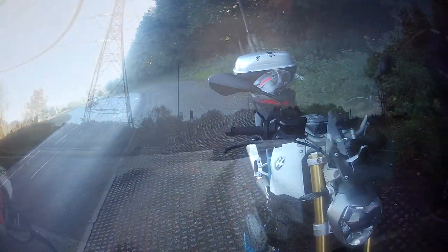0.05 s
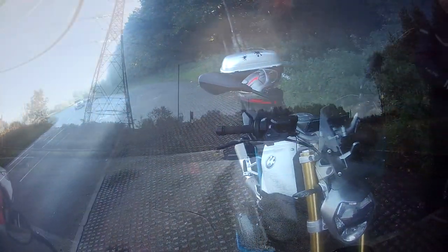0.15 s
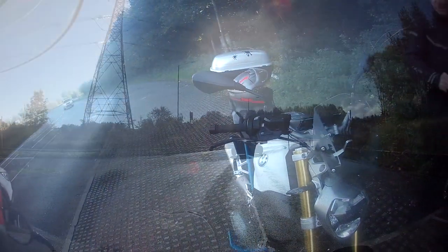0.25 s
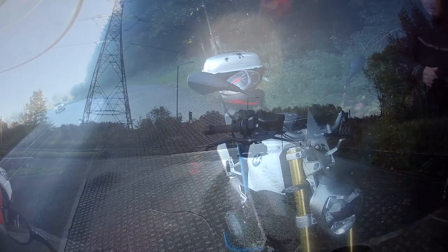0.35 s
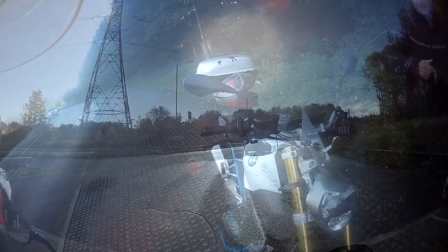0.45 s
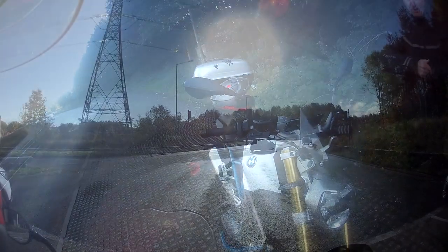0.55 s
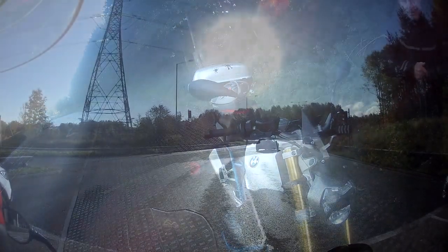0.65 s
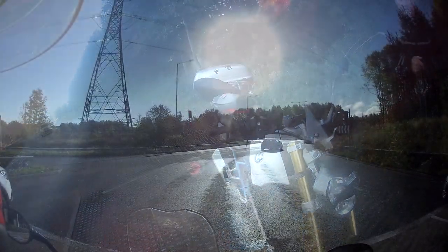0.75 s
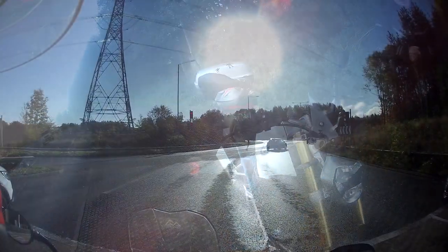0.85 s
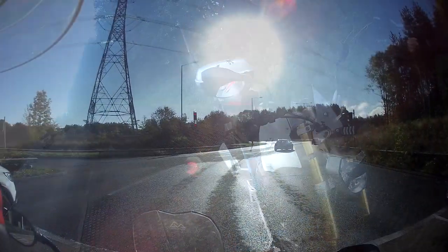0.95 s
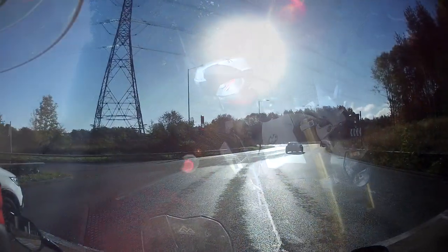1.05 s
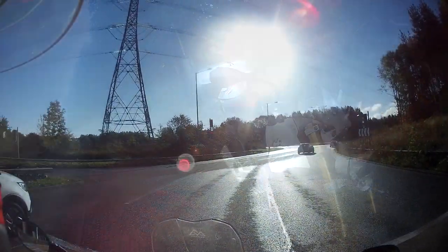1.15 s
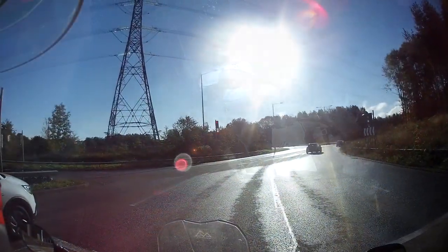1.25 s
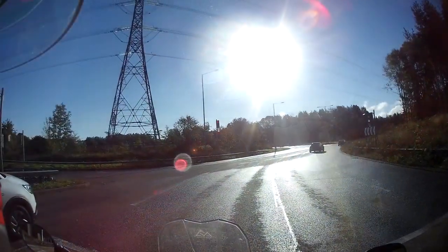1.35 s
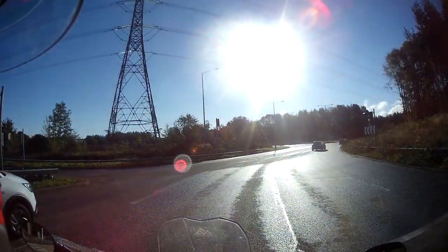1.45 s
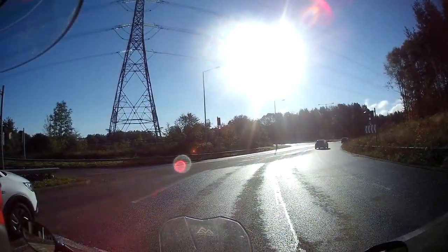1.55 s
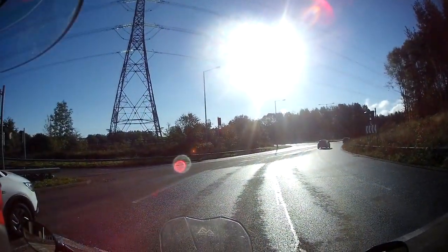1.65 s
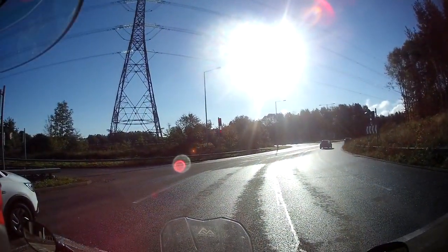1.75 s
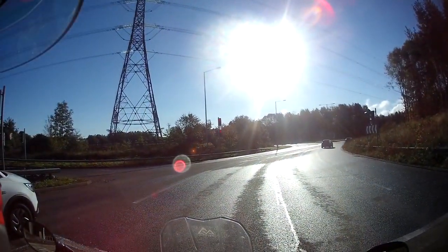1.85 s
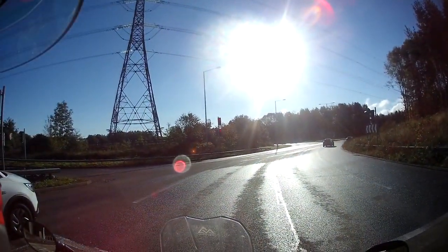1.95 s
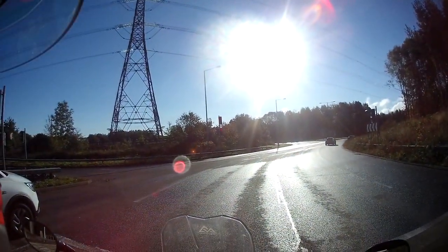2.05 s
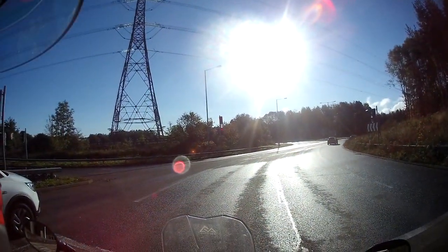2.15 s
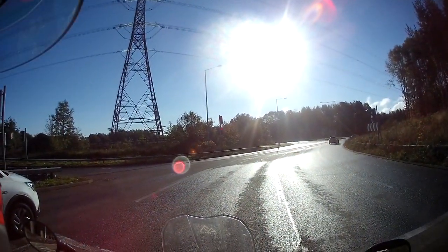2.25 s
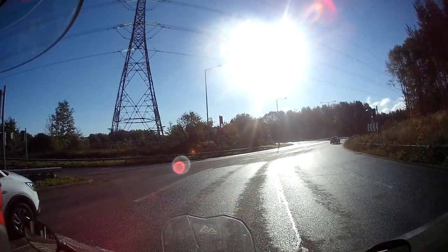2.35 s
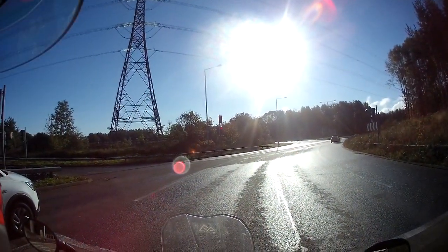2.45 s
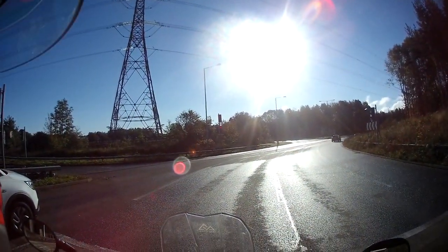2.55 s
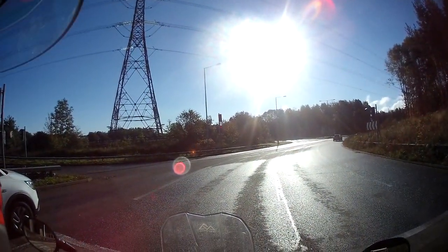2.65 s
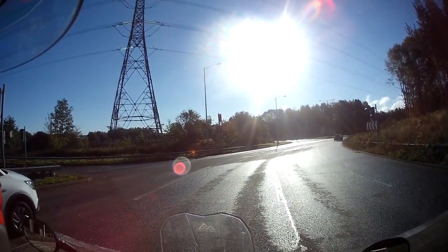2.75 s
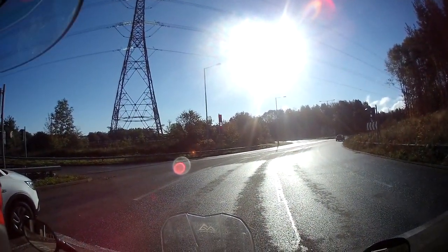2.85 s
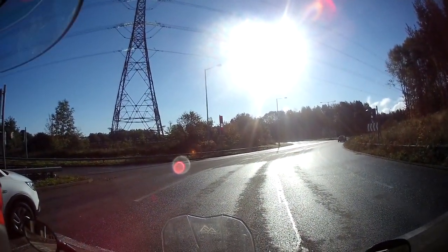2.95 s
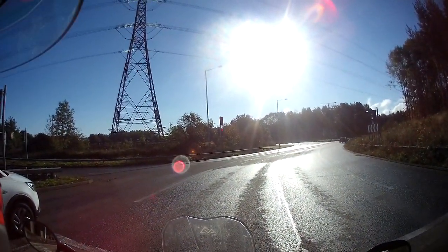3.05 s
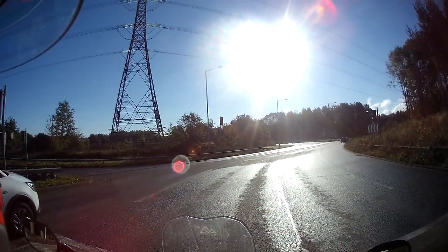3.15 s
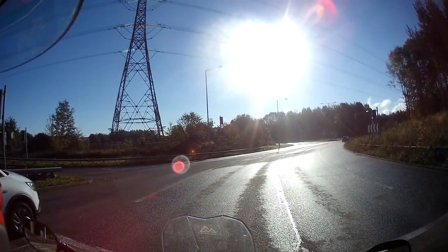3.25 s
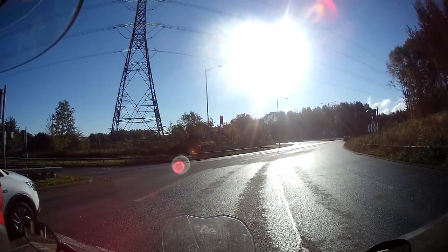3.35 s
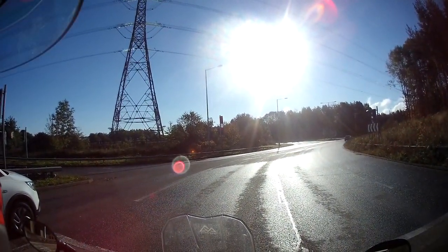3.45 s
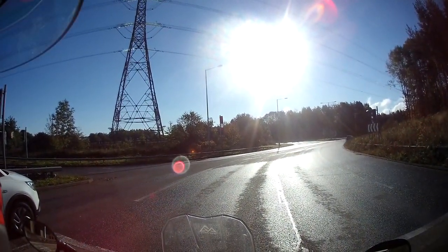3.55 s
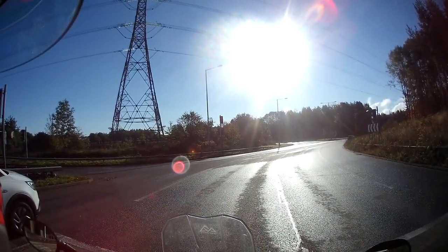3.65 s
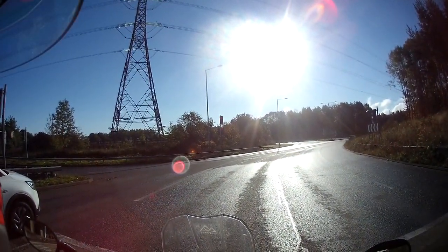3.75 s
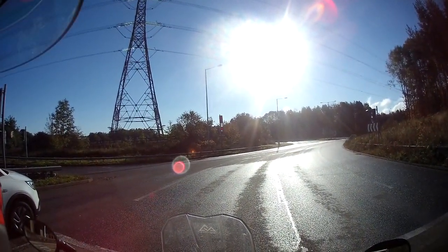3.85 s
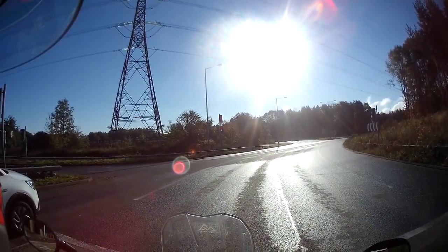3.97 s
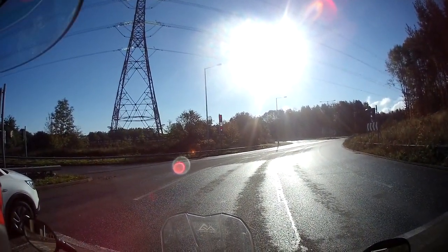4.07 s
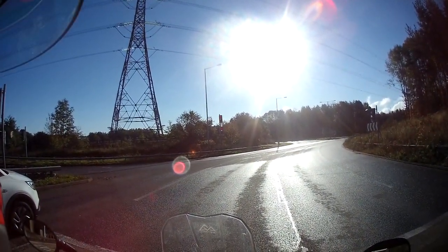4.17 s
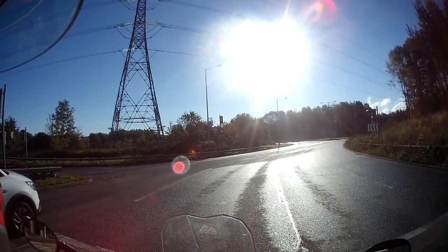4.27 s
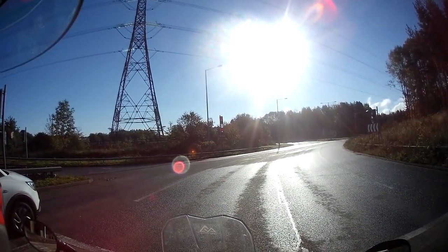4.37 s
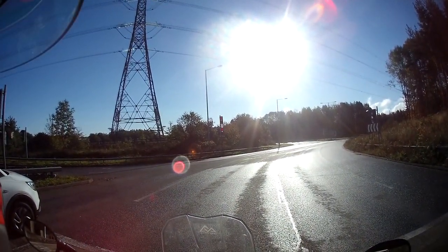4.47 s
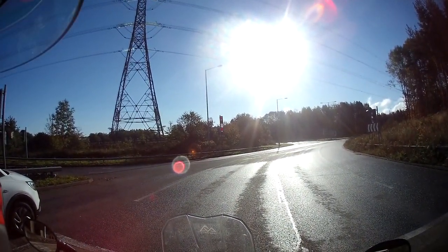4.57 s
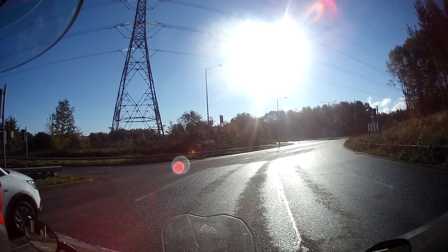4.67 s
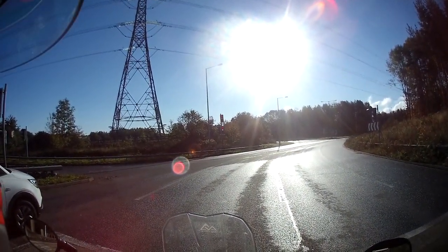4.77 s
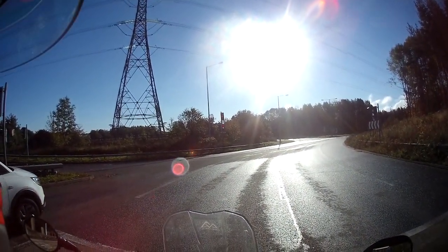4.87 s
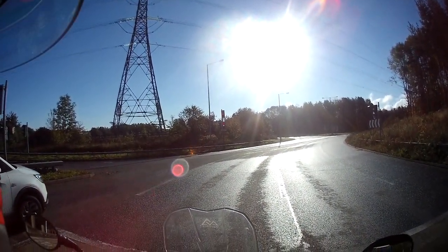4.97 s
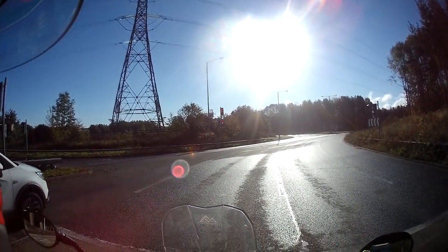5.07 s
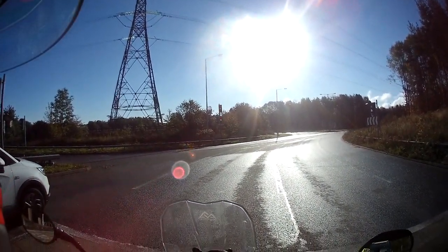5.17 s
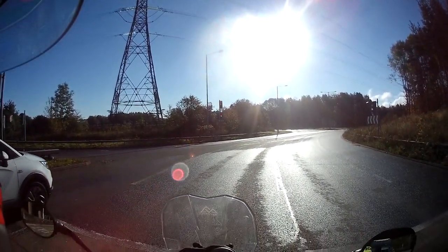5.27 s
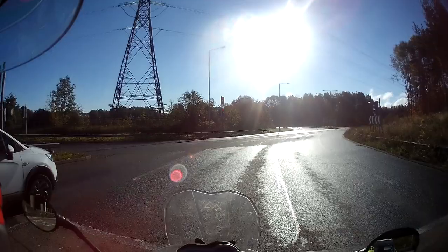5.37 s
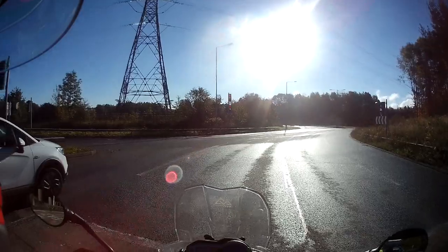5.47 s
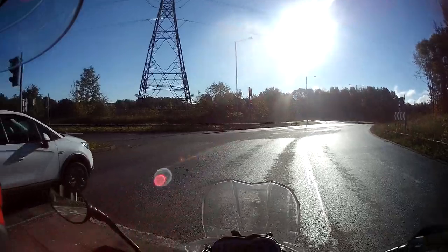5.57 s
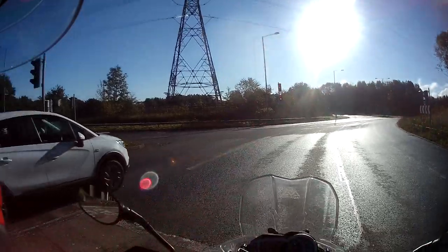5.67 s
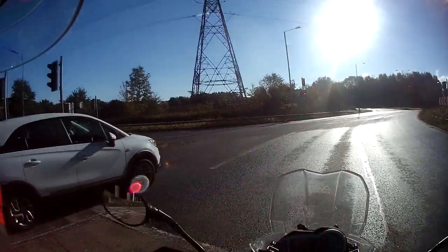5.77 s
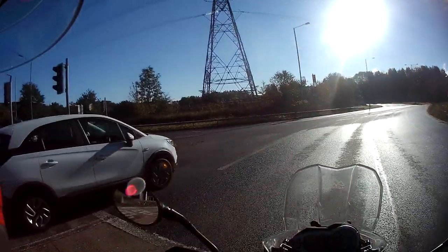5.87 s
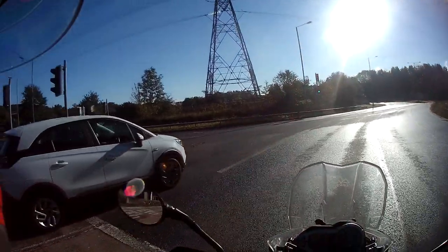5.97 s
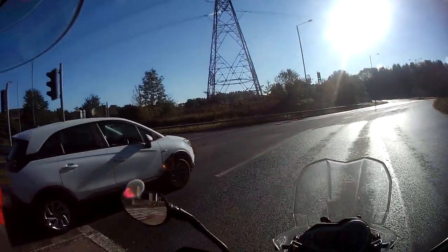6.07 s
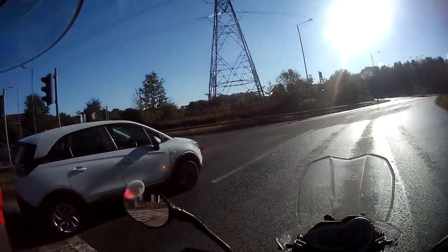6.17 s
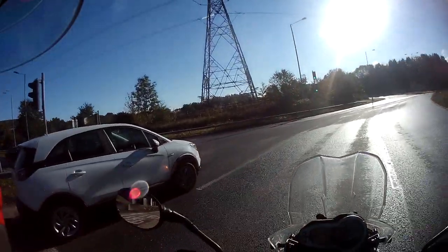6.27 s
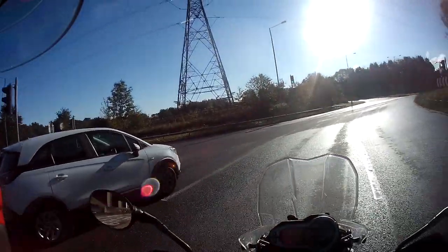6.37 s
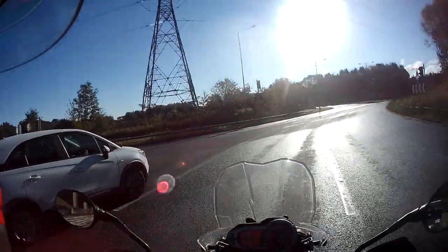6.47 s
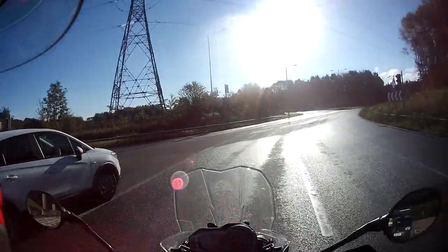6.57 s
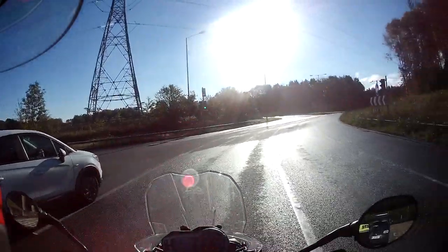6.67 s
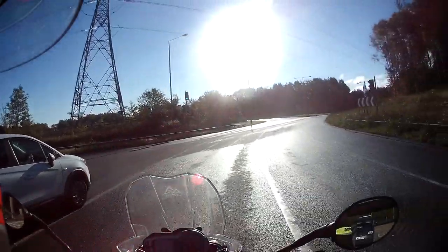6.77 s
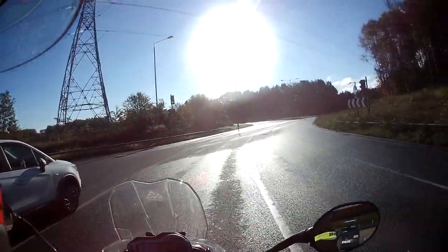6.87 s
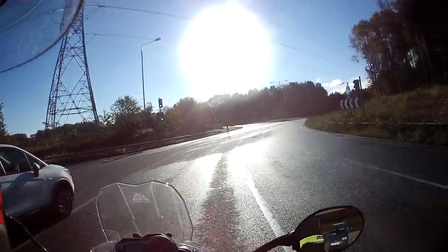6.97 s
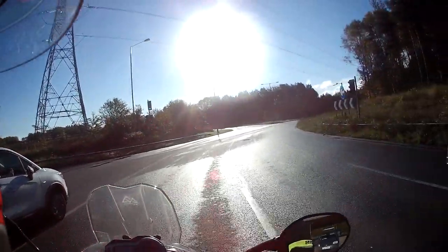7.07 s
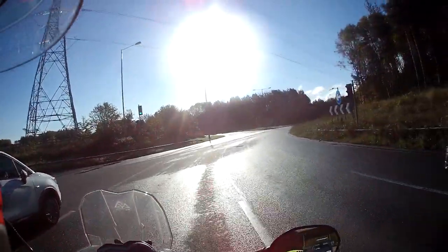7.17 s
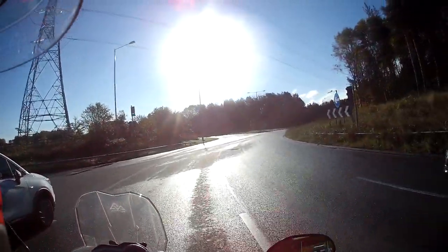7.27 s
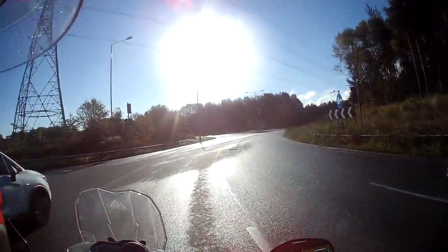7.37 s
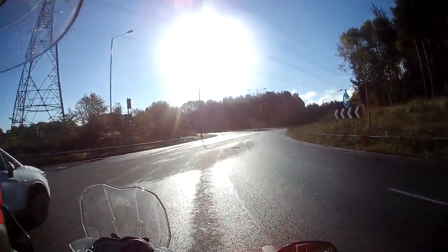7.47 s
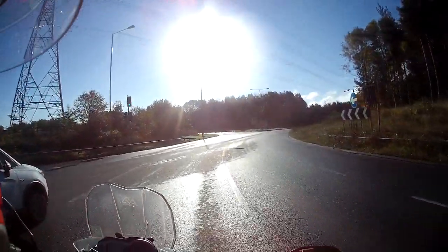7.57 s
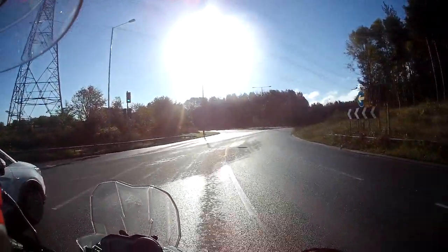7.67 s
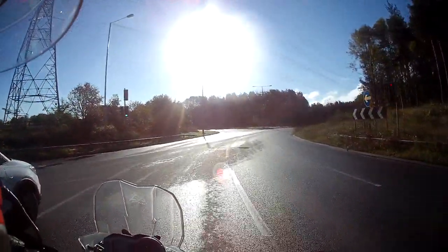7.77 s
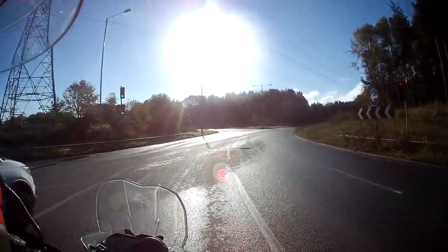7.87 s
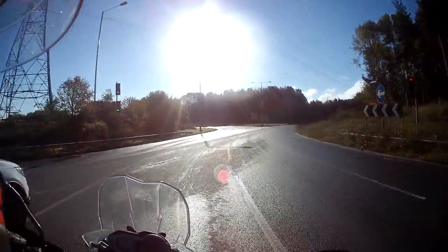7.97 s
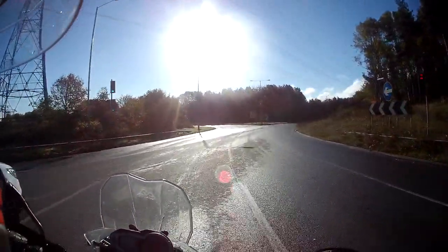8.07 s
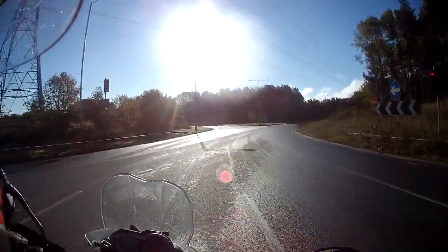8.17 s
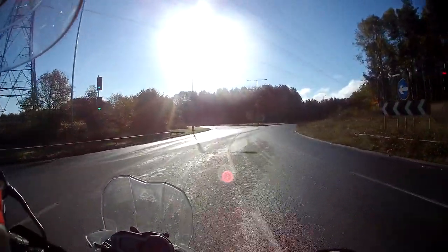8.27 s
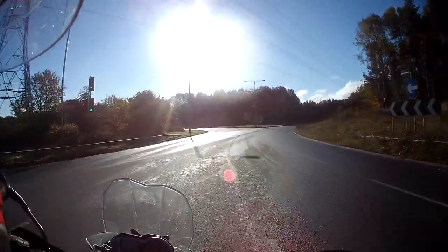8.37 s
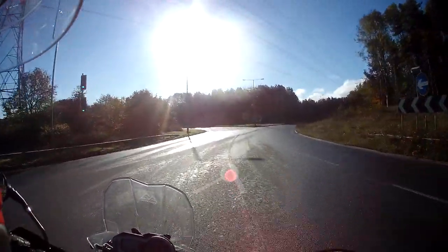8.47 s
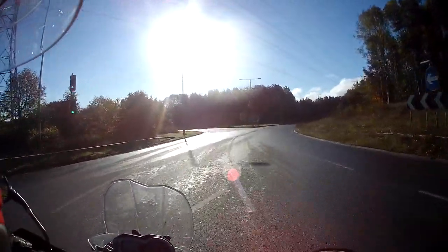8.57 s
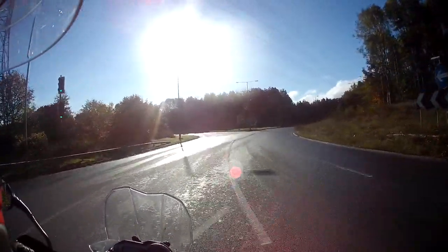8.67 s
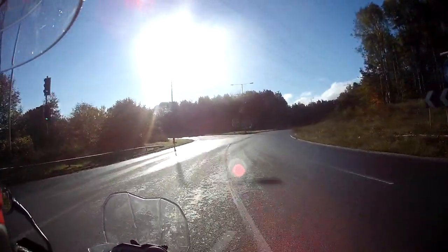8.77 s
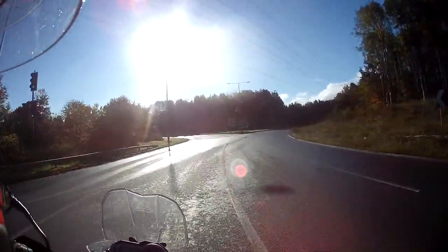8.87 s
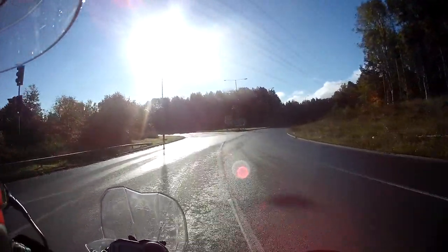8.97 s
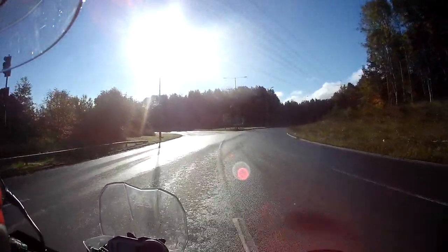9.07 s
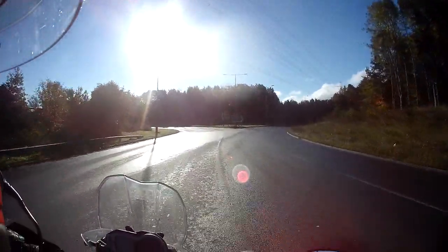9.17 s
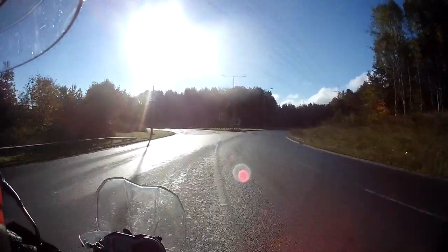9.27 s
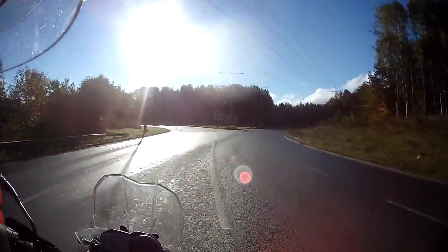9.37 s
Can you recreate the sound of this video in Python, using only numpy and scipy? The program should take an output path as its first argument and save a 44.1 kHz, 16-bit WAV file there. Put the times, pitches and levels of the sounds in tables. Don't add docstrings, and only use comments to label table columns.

```python
import sys
import numpy as np
from scipy import signal
from scipy.fft import rfft, irfft, next_fast_len
from scipy.io import wavfile
from scipy.ndimage import uniform_filter1d

SR = 44100
rng = np.random.default_rng(int(sys.argv[2]) if len(sys.argv) > 2 else 0)


def put_to_file(sound):
    columns = np.atleast_2d(sound).T
    safe = np.clip(columns, -1, 1)
    whole_steps = np.round(safe * 32767)
    wavfile.write(sys.argv[1], SR, whole_steps.astype(np.int16))


def volts_from_db(level):
    exponent = np.asarray(level, float) / 20
    return 10 ** exponent


N = 415422
TIME = np.arange(N) / SR
IDLE_HZ = 31

# start_s, level_db
CAR_LEVEL = [(0.0, -31), (0.008, -32.5), (0.086, -33.5), (0.308, -42.5), (0.38, -49), (0.5, -66)]
# frequency_hz, density_db
TYRE_COLOUR = [(120, -52), (200, -9.5), (505, -29), (563, -16), (663, -23), (752, -9), (1010, 0.5),
               (1670, -10.5), (2000, -22), (2230, -32), (2880, -30), (3100, -29), (3800, -27), (4300, -18),
               (4900, -32), (7140, -43), (15300, -42)]
# start_s, firing_hz, drive_load (0-1), exhaust_db, main_gear_teeth_db
PULL_AWAY = [(0.0, 32.5, 0.33, -45.5, -47), (1.2, 32.08, 0.1, -45.5, -43), (2.2, 31.85, 0.11, -45, -40.5),
             (2.5, 31.04, 0.01, -46.5, -42), (4.96, 31.58, 0, -45.5, -41.5), (5.02, 37.5, .02, -41.5, -44),
             (5.06, 40.7, 0.02, -39.5, -43.5), (5.14, 47, 0.1, -38.5, -44), (5.37, 60.27, 0, -35, -31.5),
             (5.45, 65.97, 0.1, -37.5, -39), (5.61, 75.4, 0.23, -34, -47), (5.7, 77.3, 0.01, -30.5, -47),
             (5.8, 75.8, 0.03, -29.5, -46), (5.97, 72.2, 0, -34.5, -48), (6.21, 62.7, 0.05, -36, -42),
             (6.49, 56.1, 0.25, -34, -46), (6.66, 56.13, 0.45, -35, -48), (6.92, 61.05, 0.31, -34.5, -38),
             (7.14, 58.15, 0.6, -36.5, -43), (7.5, 68.85, 0.44, -35.5, -49), (7.75, 76.42, 0.62, -32, -45),
             (8.0, 84.6, 0.78, -32, -45), (8.24, 92, 1, -34, -40.5), (8.48, 99.4, 1, -30, -36.5),
             (8.74, 106.1, 0.96, -33, -39)]
# start_s, firing_hz, drive_load (0-1), exhaust_db, main_gear_teeth_db
SHIFT_UP = [
    (8.82, 108.7, 0.39, -37.5, -39),
    (8.87, 94.5, 0.57, -40, -37.5),
    (8.93, 83.56, 0.19, -31.5, -40),
    (9.0, 78.3, 0.15, -42, -37),
    (9.08, 84.84, 0.21, -34, -39),
    (9.14, 94.74, 0.83, -35, -35),
    (9.19, 95.55, 0.57, -35, -40),
    (9.215, 84.84, 0.43, -32.5, -37),
    (9.37, 85.75, 0.65, -30.5, -35),
]
CYLINDER_DB = [-3, -1, -1.5]
# frequency_hz, gain_db
EXHAUST_RESPONSE = [(60, -35), (110, -7), (150, -13.5), (190, 2), (228, 6), (265, -2), (305, -2),
                    (350, -15.5), (420, -23), (540, -9), (660, -47.5), (800, -36), (1500, -56)]
# frequency_hz, gain_db
INTAKE_RESPONSE = [(60, -2.5), (100, 10), (190, 4), (220, 11), (252, -6.5), (290, 3.5), (400, -25),
                   (1000, -55)]
# frequency_hz, gain_db
BARK_RESPONSE = [(115, -25), (150, 10), (185, -20), (250, -39), (330, 0), (370, -9), (410, 1.5), (475, 2),
                 (560, -9), (660, 4.5), (780, -11.5), (1200, -44)]
# start_s, bark_db
THROTTLE_BARK = [(5.0, -24), (5.4, -6.5), (5.7, -14.5), (6.5, -11), (7.0, -17), (7.3, -4.5), (7.6, -15),
                 (8.0, -10), (8.22, -8), (8.38, -2.5), (8.74, -6.5), (8.85, -9), (9.4, -12.5)]
# frequency_hz, gain_db
AIRBOX_RESPONSE = [(15, -44), (30, 4), (50, 3.5), (68, 12), (100, 2), (130, -14), (250, -61.5)]
# firing_hz, gain_db
AIRBOX_TUNING = [(33, 2.5), (38, 11.5), (47, 2), (57, -3.5), (68, 3), (85, 0.5), (110, -4)]
# frequency_hz, width_hz, gain_db
CASING_MODES = [(1013, 132, 10), (1530, 630, -5.5), (2083, 80, 2.5), (495, 460, -7.5), (3950, 80, -24.5)]
# frequency_hz, density_db
RATTLE_COLOUR = [(150, -9.5), (250, -6.5), (334, -10), (400, -9), (656, -8.5), (772, -12.5), (1450, -17),
                 (1640, -20.5), (2080, -23), (5000, -39), (6500, -43), (11000, -120)]
# frequency_hz, density_db
GAS_COLOUR = [(1760, -13.5), (3000, -12.5), (3410, -14), (3860, -14), (5070, -18), (6140, -21),
              (8400, -33.5), (9820, -28.5), (11400, -31.5), (12800, -37), (15300, -61)]
# start_s, over_hiss_db
GAS_SPIT = [
    (4.64, -40),
    (4.652, 1),
    (4.666, -5),
    (4.68, -38),
]
# teeth_per_firing, level_db, train (0 main, 1 upper, 2 idler), idle_change_db
GEAR_TEETH = [
    (17, -6, 0, 0),
    (24, -14, 0, 0),
    (34, 0, 0, 0),
    (68, 1.5, 1, -7.5),
    (83.5, 1.5, 2, 0),
    (88.5, 2, 1, -2),
]
# start_s, upper_train_db, idler_db
TOOTH_SLACK = [(0.3, 3, -14), (1.1, -0.5, -14), (4.96, -0.5, -14), (5.0, -4, -14), (5.05, -2, -8),
               (5.09, 0, -4), (5.2, -3, -3), (5.37, -1, -2), (5.5, -2, -3), (5.7, -4, -8), (5.9, -1, -6),
               (6.1, -1, -3), (6.35, -2, -3), (6.55, -3, -6), (6.62, -4, -3), (6.7, -4, 0), (6.8, -2, -8),
               (7.1, 0, -5), (7.4, -1, -3), (7.55, -1, -4), (7.8, 0, -12), (8.1, 0, -12), (8.8, 3, -12),
               (9.1, 3, -12), (9.22, -8, -12)]
# frequency_hz, gain_db
CASE_RADIATION = [(600, -12), (1050, -5), (1250, -11), (1450, 4), (1750, -4), (2100, -10), (2450, -2),
                  (2680, 1), (3000, 1), (3200, -6), (3600, -5), (4200, -1), (4570, 1), (4900, -4),
                  (5700, -4), (6500, -8), (7500, -26)]
# start_s, level_db
COVER_BUZZ = [(4.7, -76), (4.95, -67), (5.1, -68), (5.2, -70), (5.45, -65), (5.7, -61.5), (5.9, -63),
              (6.1, -67), (6.5, -75), (7.5, -74), (8.0, -85)]
# frequency_hz, width_hz, gain_db
COVER_MODES = [(2730, 70, -4), (2920, 45, 0), (3960, 70, -12), (4550, 90, -15)]
# start_s, peak_db, ring_hz
RELAY_TICKS = [(0.7731, -49, 3730), (1.046, -46, 3670), (1.2594, -57.5, 3670), (1.7394, -51, 3940),
               (2.1984, -48, 3975), (2.4399, -48, 3720), (2.6838, -51, 3950), (2.9253, -57, 3935),
               (3.1647, -56, 3710), (3.6461, -49, 3783), (3.8994, -82, 3630), (4.13, -56, 3740),
               (4.3725, -52, 4000), (4.617, -49, 3876)]
# start_s, peak_db, ring_hz
TAPPET_TICKS = [(1.3479, -61, 7130), (1.5909, -62, 10100), (1.8747, -62.5, 9940), (2.0304, -58, 7180),
                (2.2104, -63, 10400), (2.4025, -60.5, 7160), (2.5028, -62, 7350), (3.0106, -63, 7040),
                (3.1084, -62, 10500), (3.268, -64, 7790), (3.7474, -63, 7000), (3.7839, -59, 9810),
                (3.8497, -62.5, 9070), (4.599, -62, 6994), (4.6504, -60, 8080), (4.9462, -61, 7960),
                (5.1692, -55, 10410), (5.6831, -49, 9940), (6.3321, -52, 10420), (6.3855, -52, 7360),
                (6.9532, -47, 10440), (7.0035, -50, 7090)]
# start_s, peak_db, ring_hz
DRIVE_KNOCKS = [
    (6.396, -38, 1486),
    (6.416, -38, 1800),
    (6.424, -36, 1610),
    (6.44, -40, 1520),
    (6.8, -41, 1750),
]
# start_s, level_db
WIND_LEVEL = [
    (5.2, -50),
    (6.0, -59),
    (7.0, -48),
    (7.8, -37.5),
    (8.65, -29),
    (9.05, -28),
    (9.38, -29),
]
# frequency_hz, density_db
BUFFET_COLOUR = [(15, -4), (30, -16), (60, -17.5), (120, -20.5), (250, -29), (600, -42.5), (2000, -63)]
# centre_s, peak_db, swing_hz, length_swings
WIND_EDDIES = [(7.7, -24, 75, 1.04), (8.01, -26, 35, .8), (8.23, -37, 40.06, 0.68),
               (8.345, -25, 59.9, 0.77), (8.455, -23, 54.9, .8), (8.615, -23, 42, 0.83),
               (8.68, -21.5, 104.7, 1.4), (8.74, -19, 45.1, 0.63), (8.775, -22, 86, 1.09),
               (8.825, -18.5, 54.93, .8), (8.895, -26, 40, .5), (8.935, -20, 81.9, 1.9),
               (9.001, -23, 65, 1.2), (9.12, -26, 70, .7), (9.19, -22, 50.06, 0.64), (9.255, -14, 50, 0.49),
               (9.3, -26, 95, 0.78), (9.345, -16, 44.9, 0.72), (9.385, -28, 90, 0.75)]


def level(x, db):
    return x * volts_from_db(db) / np.sqrt(np.mean(x ** 2))


def curve(rows):
    s, *columns = np.transpose(rows)
    return [np.interp(TIME, s, c) for c in columns]


def colour(x, spectrum):
    size = next_fast_len(N)
    hz, db = np.transpose(spectrum)
    log_hz = np.log(np.arange(size // 2 + 1) * SR / size + 1)
    gain = volts_from_db(np.interp(log_hz, np.log(hz), db, left=-90, right=-90))
    return irfft(rfft(x, size) * gain, size)[:N]


def noise(spectrum):
    return level(colour(rng.standard_normal(N), spectrum), 0)


def thump(x, spectrum):
    size, short = next_fast_len(N), 2 ** 14
    hz, db = np.transpose(spectrum)
    log_hz = np.log(np.arange(short // 2 + 1) * SR / short + 1)
    gain = volts_from_db(np.interp(log_hz, np.log(hz), db, left=-60, right=-70))
    cepstrum = irfft(np.log(gain))
    cepstrum[1:short // 2] *= 2
    response = irfft(np.exp(rfft(cepstrum[:short // 2], short)))
    return irfft(rfft(x, size) * rfft(response, size), size)[:N]


def ring(x, modes):
    out = 0
    for k, (hz, width, db) in enumerate(modes):
        out = out + (-1) ** k * volts_from_db(db) * signal.lfilter(*signal.iirpeak(hz, hz / width, SR), x)
    return out


def walk(rate):
    hold = int(SR / rate)
    steps = np.repeat(rng.standard_normal(N // 100), hold)[:N]
    return 1.3 * uniform_filter1d(uniform_filter1d(steps, hold), hold)


def pulses(phase, size):
    turns = np.arange(np.ceil(phase[0]), phase[-1])
    at = np.interp(turns, phase, np.arange(N))
    out, i = np.zeros(N + 1), at.astype(int)
    height = size[turns.astype(int)]
    out[i] += height * (1 - at + i)
    out[i + 1] += height * (at - i)
    return out[:N]


def steady(x):
    power = uniform_filter1d(uniform_filter1d(x ** 2, SR // 8), SR // 8)
    return x / np.sqrt(np.abs(power) + 1e-12)


def car():
    level_db, = curve(CAR_LEVEL + [(.6, -86)])
    return noise(TYRE_COLOUR) * volts_from_db(level_db - 2.0 + 0.37 * walk(32.0))


def controls():
    hz, load, pressure_db, main_db = curve(PULL_AWAY + SHIFT_UP)
    octaves = np.log2(hz / IDLE_HZ)
    surge = uniform_filter1d(np.gradient(hz) * SR / 100, SR // 20)
    surge = np.clip(surge, -0.95, 0.95)

    def law(idle_db, octave_db, load_db, surge_db):
        return idle_db + octave_db * octaves + load_db * load + surge_db * surge

    def after(s):
        return uniform_filter1d(1. * (TIME > s), SR // 20)

    clutch_in = after(8.9)
    hunt = walk(7)
    tuning_db = np.interp(hz, *np.transpose(AIRBOX_TUNING))
    boom_db = pressure_db + law(4, -7, 11.5, -3.5) + 0.59 * hunt + tuning_db
    upper_slack_db, idler_slack_db = curve(TOOTH_SLACK)
    train_law_db = law(-48.5, -4.5, 0, -0.5)
    upper_db = train_law_db + upper_slack_db + 7 * clutch_in + 2 * (1 - after(2.5))
    train_db = main_db, upper_db, train_law_db + idler_slack_db
    hz = hz * (1 + .012 * hunt * np.clip(1 - 3 * octaves, 0, 1))
    exhaust_db = pressure_db + 1.0856 * walk(9)
    clatter_db, gas_db = law(-44, 4.5, 7, -0.5), law(-63.5, 7.5, 4, 0)
    return hz, load, clutch_in, exhaust_db, boom_db, clatter_db, gas_db, train_db


def pipes(phase, idle, cylinder_db):
    fire_chance, gulp_chance = rng.standard_normal((2000, 2)).T
    fire = pulses(phase, volts_from_db(cylinder_db + 0.5 * fire_chance))
    gulp = idle * pulses(phase - .56, volts_from_db(1.06 * gulp_chance))
    echo = .5 * (1 - idle) * pulses(phase - .25, volts_from_db(cylinder_db))
    bark = (1 - idle) * volts_from_db(curve(THROTTLE_BARK)[0]) * thump(fire, BARK_RESPONSE)
    tail = thump(fire + echo + 0.033 * gulp, EXHAUST_RESPONSE)
    exhaust = steady(tail + thump(0.21 * gulp, INTAKE_RESPONSE) + bark)
    boom = steady(thump(fire + 3.3 * gulp, AIRBOX_RESPONSE))
    return exhaust, boom


def clatter(hz, load, idle, puff, cycle):
    casing = level(ring(rng.standard_normal(N) * (.5 + puff + 0.16 * cycle), CASING_MODES), -5.0)
    tank = level(ring(rng.standard_normal(N) * (0.43 + cycle), [(653.5, 9.9, 0)]), -7.5)
    rattle = noise(RATTLE_COLOUR)
    low_rattle = colour(rattle, [(20, 3), (560, -8.5), (800, -17)])
    rattle = rattle - np.clip(0.37 * load, 0, 1) * low_rattle
    casing = casing * (0.42 + idle)
    tank = tank * (0.24 + idle + 0.26 * (hz / 100) ** 4)
    rattle = rattle * (1 - 0.45 * idle) * (1.36 + 0.079 * puff) * volts_from_db(1.8 * walk(12))
    return steady(casing + tank + rattle)


def gas(puff, cycle):
    moving = np.clip((TIME - 5.5) / 0.86, 0, 1)
    bright = noise([(7000, 2), (10000, 4), (13500, -2.0), (15300, -4)])
    jet = noise(GAS_COLOUR) + volts_from_db(-14.5) * moving * bright
    pulsed = jet * (0.098 + .5 * puff + 0.24 * cycle) * volts_from_db(0.15 * walk(15))
    return steady(pulsed) * (1 + volts_from_db(curve(GAS_SPIT)[0]))


def gears(hz, phase, load, clutch_in, train_db):
    slow = np.minimum(31 / hz, 1)
    swing = .056 * slow ** 1.1 * (1 + .16 * walk(22)) * np.sin(2 * np.pi * phase + 1.2)
    drift = .009 * slow ** 2 * walk(14)
    judder = .036 * (1.12 - slow) * (1 - .4 * clutch_in) * walk(260)
    crank_hz = hz * (1 + swing + drift + judder)
    crank = np.cumsum(crank_hz) / SR
    press_db = 3.8 * (1 + .15 * walk(12)) * (np.cos(2 * np.pi * phase + .05) - 1)
    case_hz, case_db = np.transpose(CASE_RADIATION)
    trains = np.zeros((3, N))
    for teeth, db, train, idle_db in GEAR_TEETH:
        train = int(train)
        radiated_db = np.interp(np.log(teeth * crank_hz), np.log(case_hz), case_db, right=-40)
        flicker_db = 1.1 * slow * walk(22) + (3.3 - .6 * slow - .6 * load) * walk(90) - 4 * clutch_in
        mesh_db = db + idle_db * slow ** 3 + train_db[train] + radiated_db + press_db + flicker_db
        trains[train] += volts_from_db(mesh_db) * np.sin(2 * np.pi * teeth * crank)
    buzz = volts_from_db(curve(COVER_BUZZ)[0] + 37) * rng.standard_normal(N)
    cover = ring(.12 * trains[0] + .1 * trains[1] + buzz, COVER_MODES)
    return trains.sum(axis=0) + cover


def engine(hz, load, clutch_in, exhaust_db, boom_db, clatter_db, gas_db, train_db):
    jitter = 0.0051 * np.sqrt(31 / hz) * walk(25)
    phase = 1 + np.cumsum(hz * (1 + jitter)) / SR
    idle = np.clip((31 / hz) ** 2, 0, 1)
    cylinder_db = np.resize(CYLINDER_DB, 2000)
    exhaust, boom = pipes(phase, idle, cylinder_db)
    puff = np.exp(0.42 * (np.cos(2 * np.pi * phase - .8) - 1)) * volts_from_db(cylinder_db)[phase.astype(int)]
    cycle = np.exp(0.18 * (np.cos(2 * np.pi * phase / 3) - 1))
    boom = np.roll(boom, -int(0.0065 * SR))
    mix = -exhaust * volts_from_db(exhaust_db + 1.0) - boom * volts_from_db(boom_db - 2.5)
    mix += clatter(hz, load, idle, puff, cycle) * volts_from_db(clatter_db - 0.5)
    mix += gas(puff, cycle) * volts_from_db(gas_db + 2.0)
    mix += gears(hz, phase, load, clutch_in, train_db)
    return signal.lfilter(*signal.butter(6, 14100, fs=SR), mix)


def clicks(events, tick_share, ring_s):
    out, t = np.zeros(N), np.arange(2000) / SR
    for (s, db, hz), tick in zip(events, rng.standard_normal((len(events), 2000))):
        i = int(s * SR)
        shake = np.cumsum(uniform_filter1d(tick, size=60)) * 0.12
        swell = np.exp(-t / ring_s) * (1 - np.exp(-t / 0.00069))
        tone = np.sin(2 * np.pi * hz * t + shake) * swell
        dull = uniform_filter1d(tick, size=5) * np.exp(-t / 0.0028)
        out[i:i + 2000] += volts_from_db(db) * (tick_share * dull + tone)
    return out


def relay():
    return volts_from_db(-3) * clicks(RELAY_TICKS, 0.31, 0.013)


def tappets():
    return clicks(TAPPET_TICKS, 0.05, 0.0026)


def wind():
    level_db, = curve(WIND_LEVEL)
    gust_depth_db = 1.5 * np.clip((8.5 - TIME) / 2.5, .3, 1) * (TIME > WIND_LEVEL[0][0])
    gust_db = gust_depth_db * walk(12.0)
    rush = noise(BUFFET_COLOUR) * volts_from_db(level_db + gust_db + walk(12))
    start_phases = rng.uniform(0, 2 * np.pi, len(WIND_EDDIES))
    for (s, db, hz, swings), start in zip(WIND_EDDIES, start_phases):
        near = slice(int((s - .1) * SR), int((s + .1) * SR))
        cycles = (TIME[near] - s) * hz
        rush[near] += volts_from_db(db) * np.exp(-(cycles / swings) ** 2) * np.sin(2 * np.pi * cycles + start)
    return rush


def knocks():
    return clicks(DRIVE_KNOCKS, 0.23, 0.015)


def scene():
    fade_in = np.clip(TIME / 1.26, 0, 1) ** 0.95
    mix = car() + fade_in * engine(*controls())
    mix += relay() + tappets() + wind() + knocks()
    return mix[None]


def band_limit(x):
    return signal.sosfilt(signal.butter(12, 15870, fs=SR, output="sos"), x)


def record(dry):
    rounded = .24 * np.tanh(dry / .24)
    return band_limit(rounded - .0088)


dry = scene()
out = record(dry)
put_to_file(out)
```